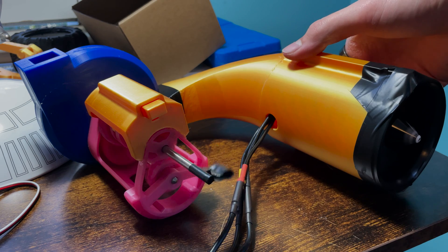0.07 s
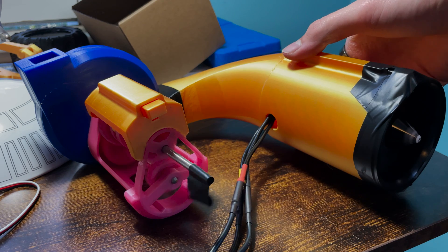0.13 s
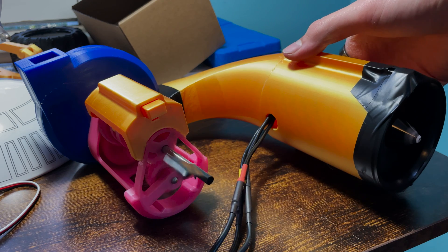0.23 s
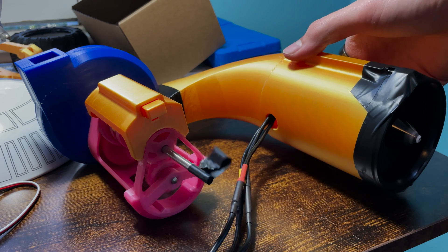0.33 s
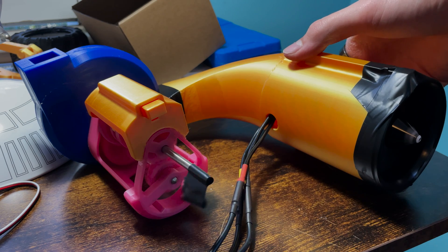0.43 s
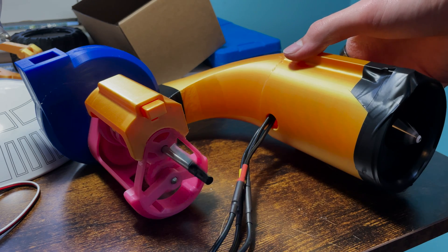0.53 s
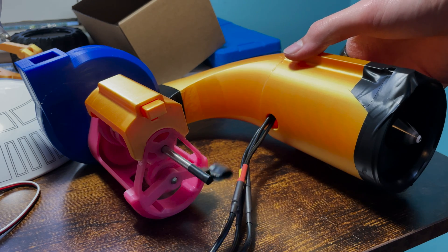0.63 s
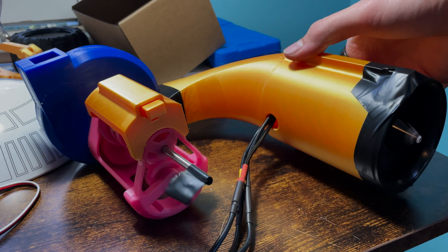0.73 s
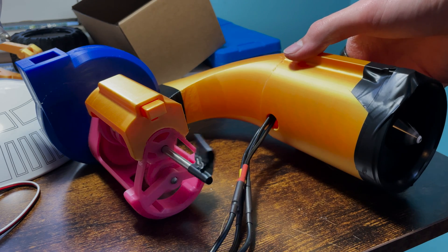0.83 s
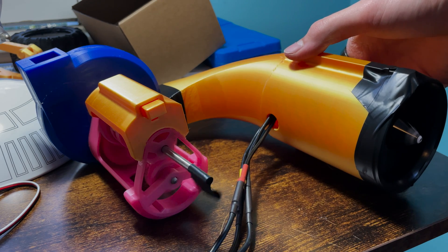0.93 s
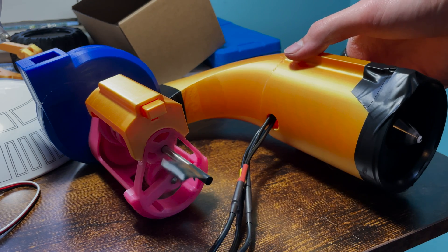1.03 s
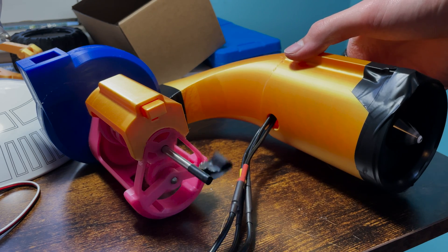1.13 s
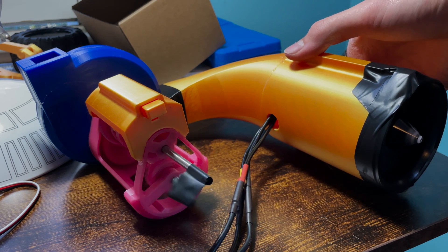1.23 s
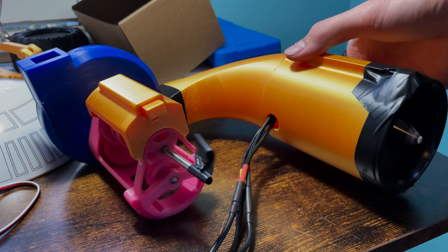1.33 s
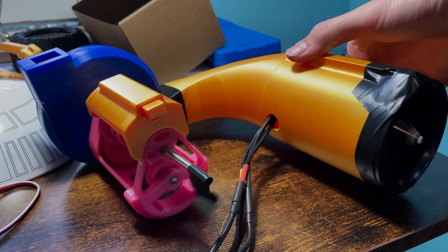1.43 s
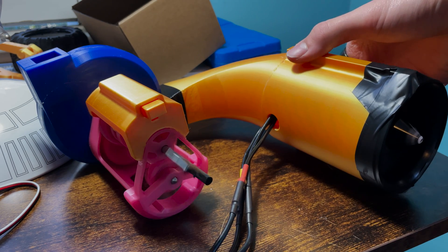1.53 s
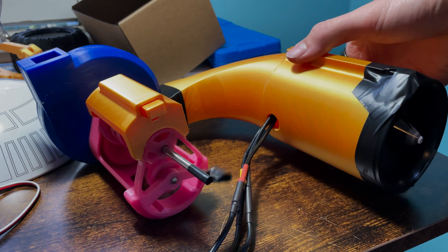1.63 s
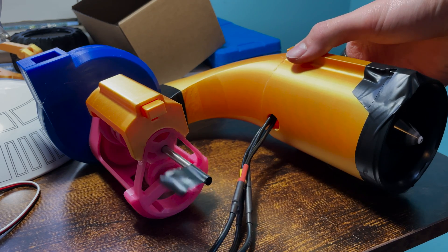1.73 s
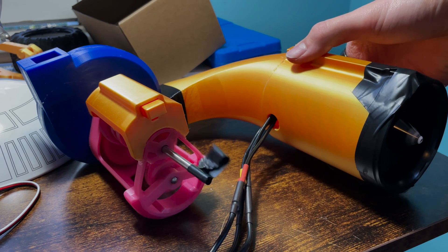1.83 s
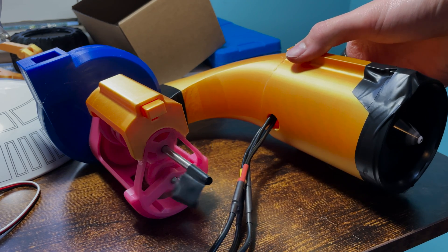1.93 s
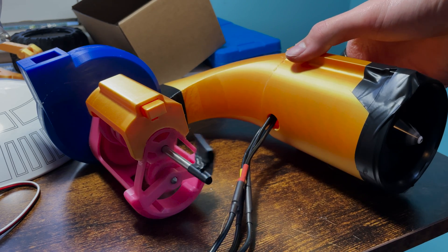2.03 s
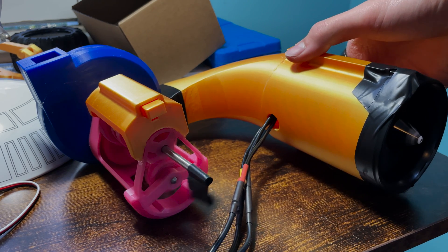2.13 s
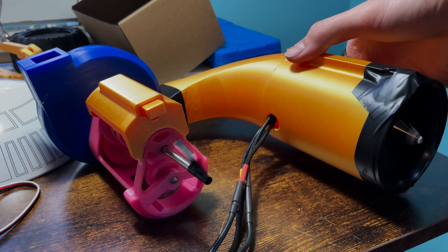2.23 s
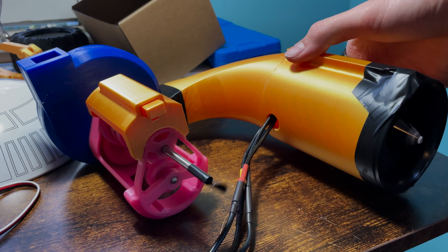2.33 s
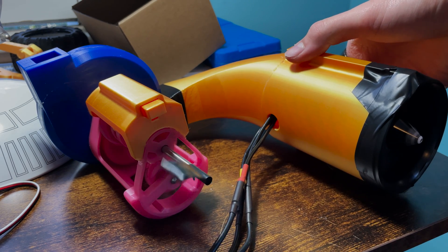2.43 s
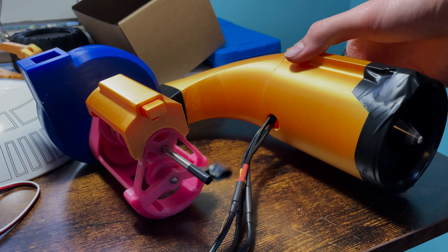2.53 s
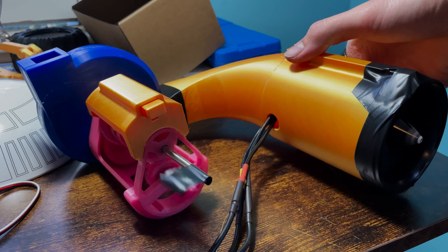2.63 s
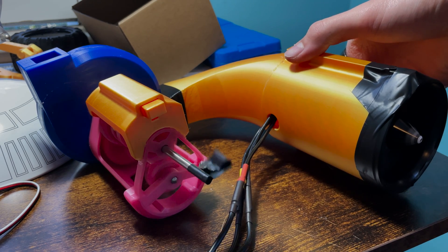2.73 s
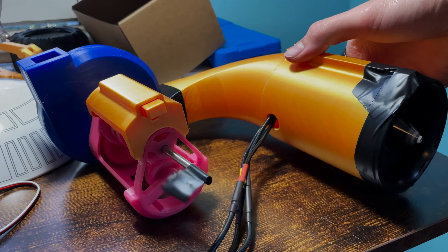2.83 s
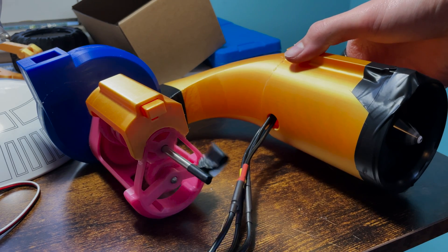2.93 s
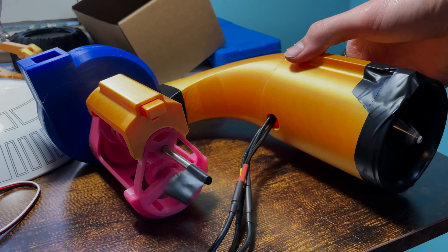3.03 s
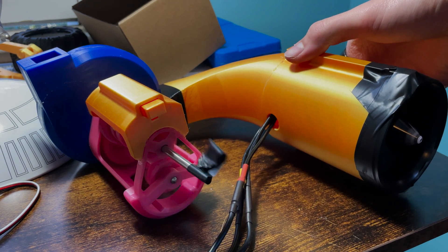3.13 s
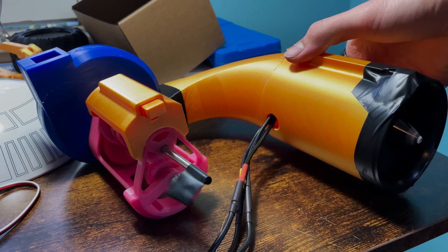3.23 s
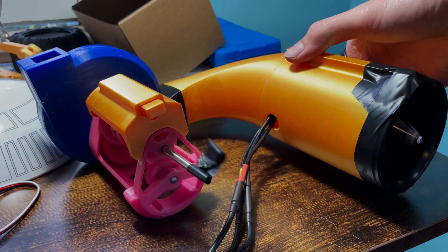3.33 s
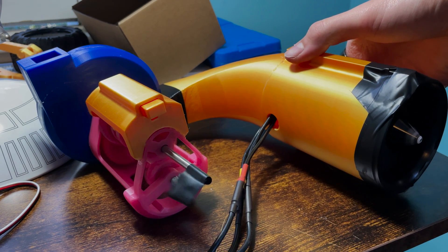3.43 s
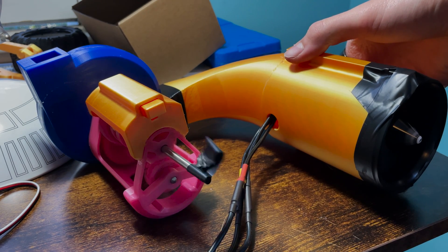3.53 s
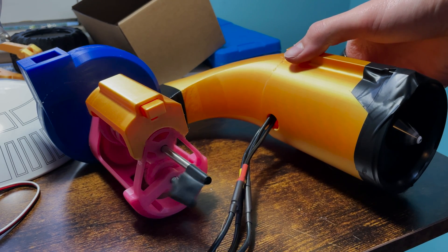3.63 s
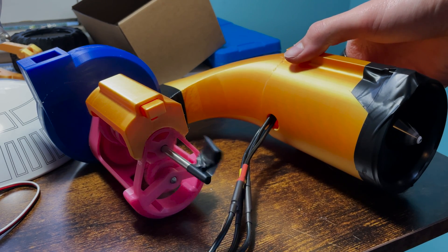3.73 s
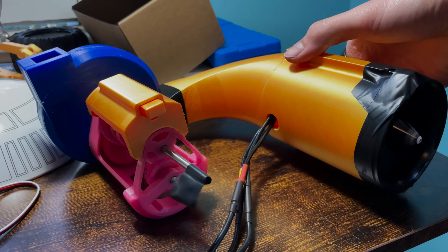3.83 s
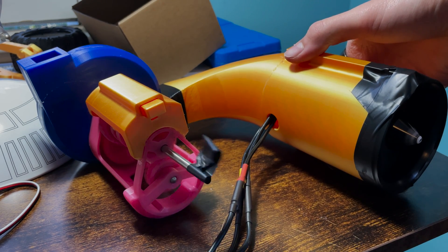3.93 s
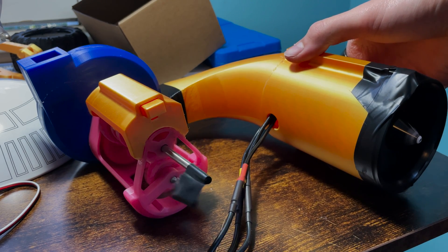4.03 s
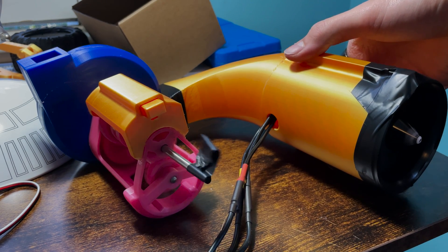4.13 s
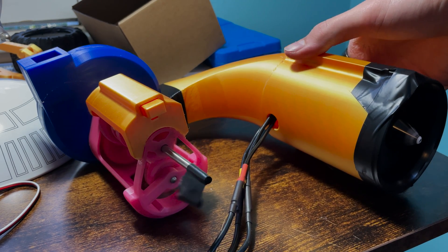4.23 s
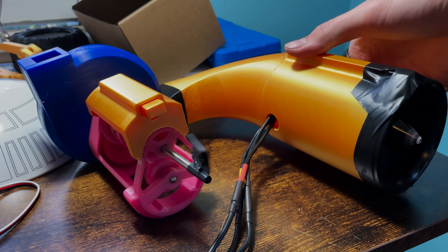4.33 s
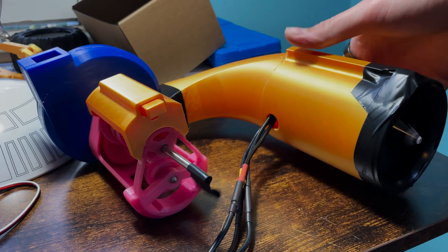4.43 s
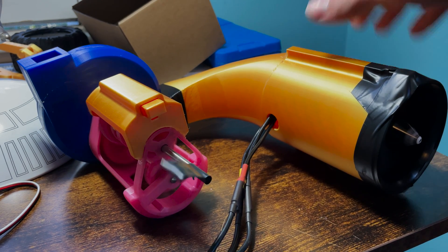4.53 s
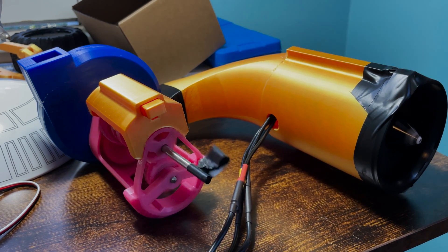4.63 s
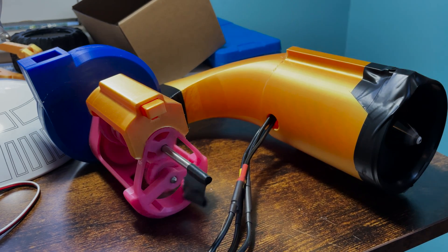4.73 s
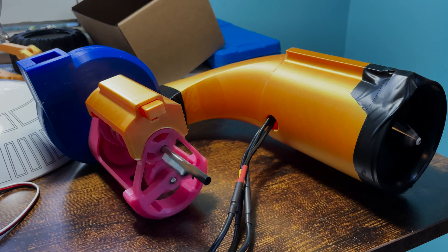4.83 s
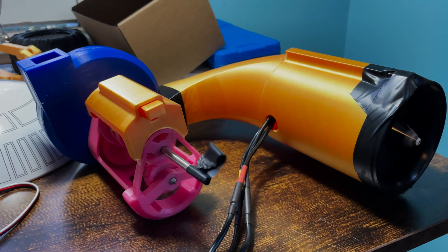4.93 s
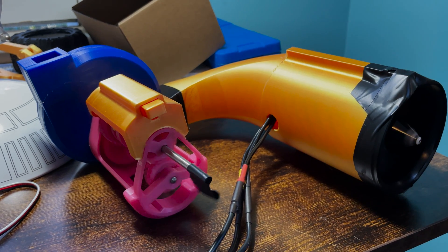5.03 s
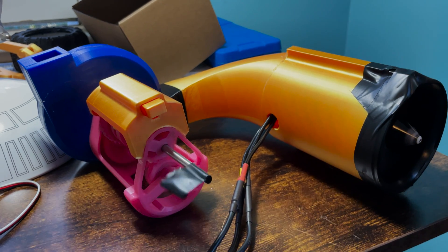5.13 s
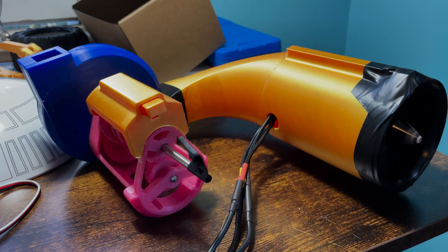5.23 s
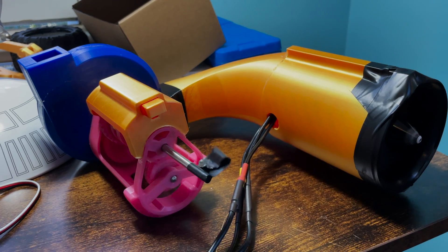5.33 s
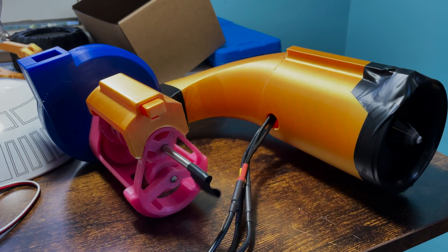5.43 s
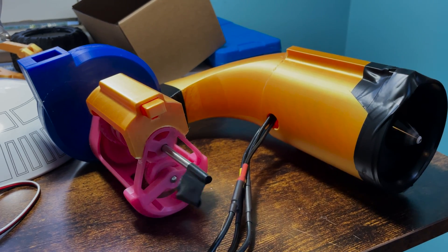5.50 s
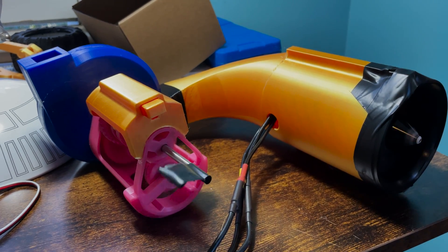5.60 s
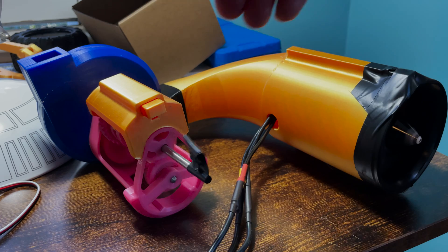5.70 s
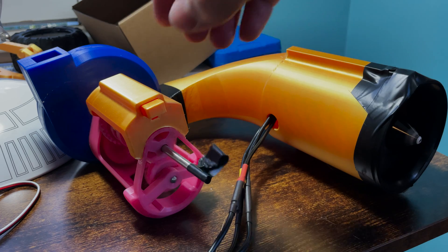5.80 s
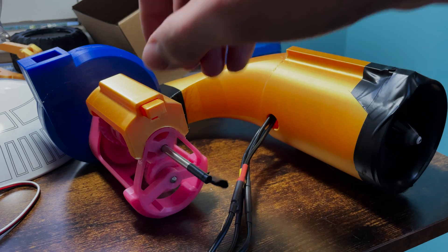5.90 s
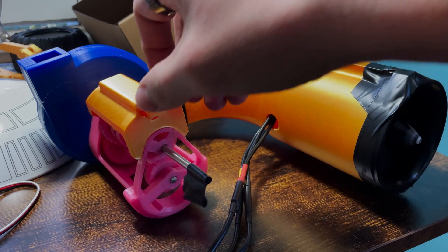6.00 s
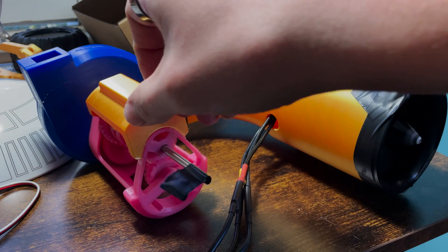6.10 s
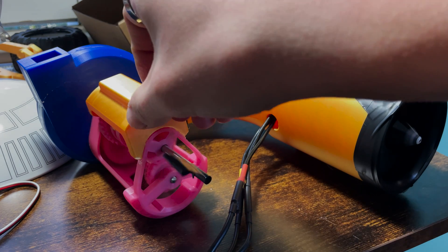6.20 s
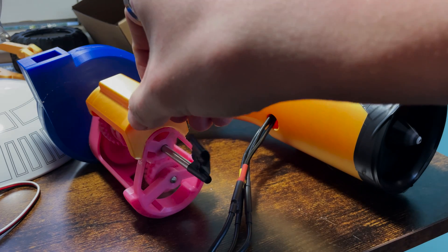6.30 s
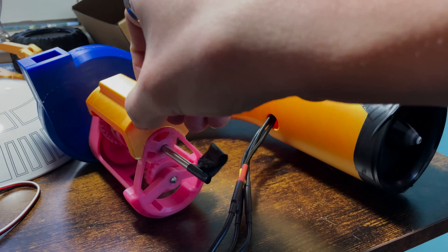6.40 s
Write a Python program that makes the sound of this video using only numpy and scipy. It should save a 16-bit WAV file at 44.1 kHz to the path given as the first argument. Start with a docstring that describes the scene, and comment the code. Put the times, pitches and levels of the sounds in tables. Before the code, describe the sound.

A small electric ducted fan blasts rushing, hissing air on a desk, abruptly narrows to a sharper hiss, then drops to a soft breathy whistle.

```python
"""On a desk, an electric ducted fan blows through a bent plastic duct into a small model turbine.
Shaped noise makes the air: it booms in the duct's resonances, hisses at the outlet and buffets the microphone.
A faint hum (two sine waves) and a whine (a narrow band of noise) climb in pitch.
For a while the sound abruptly narrows to a sharper hiss on the right.
It opens again with a puff, and the fan throttles down to a breathy whistle and picks up a little."""
import sys
import numpy as np
from scipy import signal
from scipy.fft import rfft, irfft, next_fast_len
from scipy.io import wavfile
from scipy.ndimage import map_coordinates

SR = 44100
rng = np.random.default_rng(int(sys.argv[2]) if len(sys.argv) > 2 else 0)


def to_wav(sig):
    """Store sig (one row per channel, or 1-D mono) as 16-bit WAV at the path in sys.argv[1].

    Samples outside -1..1 are clipped; the rate is SR.
    """
    pcm = np.clip(np.atleast_2d(sig), -1, 1) * 32767
    pcm = np.round(pcm).astype(np.int16)
    wavfile.write(sys.argv[1], SR, pcm.T)  # frames by channels


N = 284886

# The sound narrows, then opens again; each change is almost instant.
NARROWS_S, REOPENS_S, CHANGE_S = 2.519, 4.167, 0.0092
# The throttle is cut and the fan coasts down to idle.
THROTTLE_CUT_S = 4.169

# Slow air before the resonances colour it. Each row: frequency in Hz, relative level in dB per Hz.
BOOM_COLOUR = [(60, -55), (130, -19.5), (235, -13), (370, -6), (480, 4.5), (690, -3), (800, -11.5),
               (1000, -16), (1210, -7.5), (1500, -15.5), (2500, -22.5), (4000, -30.5)]
# How the open and the narrowed sound reach the two microphone ports. Each row: frequency in Hz,
# likeness of the two sides from 0 to 1, lead of the left side in radians, left-to-right balance in dB.
OPEN_PORTS = [(90, 0.41, 1.0, 2.5), (200, 0.64, 0.1, -2.0), (340, 0.75, 0.5, 1.0), (450, 0.95, -0.5, -3.5),
              (640, 0.79, -1.1, -2.5), (840, 0.27, -1.5, -0.5), (1060, 0.7, -0.5, -4.5),
              (1220, 0.92, -0.6, -3.5), (1580, 0.72, -1.5, 1.5), (1820, 0.4, -1.5, -1.5),
              (2200, 0.67, -1.4, 0.0), (2450, 0.33, -0.9, 0.0), (2900, 0.51, -1.4, -2.0),
              (3900, 0.85, -1.8, -2.0), (4200, 0.26, -1.6, -2.0), (4550, 0.49, -2.7, -2.0),
              (4900, 0.36, -2.9, 0.0), (5400, 0.88, -3.4, -1.5), (5950, 0.73, -3.2, -3.0),
              (6450, 0.21, -0.7, -3.0), (6750, 0.3, -1.5, -3.5), (7150, 0.39, 0.0, 0.5),
              (7600, 0.43, 0.1, 6.0), (8150, 0.58, -2.3, 0.5), (8700, 0.78, -3.3, -1.0),
              (9400, 0.86, -4.3, -2.0), (10800, 0.83, -5.7, 0.0), (12600, 0.7, -7.0, 0.0),
              (13400, 0.53, -8.0, 0.0)]
NARROW_PORTS = [(80, 0.78, 3.0, 0.0), (200, 0.87, 1.3, -4.5), (330, 0.74, 1.1, -1.5),
                (460, 0.95, 0.8, -4.5), (660, 0.21, -0.6, -4.5), (780, 0.55, -3.1, -4.0),
                (940, 0.34, -3.3, -5.5), (1230, 0.83, -1.5, -8.5), (1600, 0.54, -2.5, -2.5),
                (2350, 0.38, -2.8, -4.0), (3080, 0.85, -3.3, -3.0), (3400, 0.42, -3.4, -3.0),
                (3980, 0.72, -4.2, -6.5), (4500, 0.79, -5.5, -2.5), (4950, 0.54, -5.7, -1.5),
                (5200, 0.7, -7.3, -4.5), (5400, 0.72, -8.5, -2.0), (5920, 0.88, -8.9, -1.0),
                (6550, 0.6, -7.0, -3.0), (7500, 0.59, -6.2, -2.5), (7850, 0.35, -4.0, -1.5),
                (8150, 0.64, -4.0, -3.5), (8900, 0.48, -4.5, -10.0), (10100, 0.1, -7.1, -24.5),
                (11500, 0.07, -10.1, -14.0), (13300, 0.17, -12.1, -9.0)]
# The open stream at full throttle, before each sound's own offset is added.
# Each row: time in seconds, rush in the duct in dB, hiss at the outlet in dB.
FULL_THROTTLE = [(0, -25, -29.5), (0.2, -24.5, -28.5), (0.43, -23.5, -26.5), (0.72, -24.5, -26.5),
                 (1.0, -26, -28.5), (1.35, -27, -29), (1.55, -26, -28), (2.1, -28, -29), (2.43, -27.5, -29),
                 (2.5, -27.5, -28)]


def from_db(db):
    """Turn decibels into gain."""
    return 10 ** (np.asarray(db) / 20)


def rms_one(x):
    """Scale a sound to an average power of one."""
    return x / np.sqrt(np.mean(x ** 2) + 1e-20)


def in_time(rows):
    """Draw straight lines between the rows of a table to get each column sample by sample."""
    seconds, *columns = np.transpose(rows)
    return [np.interp(np.arange(N) / SR, seconds, column) for column in columns]


def at_hz(points, hz):
    """Read each column of a table at any frequency, on a logarithmic frequency axis."""
    table_hz, *columns = np.transpose(points)
    return [np.interp(np.log(hz), np.log(table_hz), column) for column in columns]


def ramp(start_s, length_s):
    """Stay at zero until the start, rise in a straight line to one, then stay there."""
    return np.clip((np.arange(N) / SR - start_s) / length_s, 0, 1)


def lasting(start_s, end_s, rise_s, fall_s):
    """Give one between two moments and zero outside, with a ramp centred on each moment."""
    begun = ramp(start_s - rise_s / 2, rise_s)
    ended = ramp(end_s - fall_s / 2, fall_s)
    return begun * (1 - ended)


def stages():
    """Make gates for the full, narrowed and throttled stages; the three always add up to one."""
    narrows = ramp(NARROWS_S - CHANGE_S / 2, CHANGE_S)
    reopens = ramp(REOPENS_S - CHANGE_S / 2, CHANGE_S)
    return 1 - narrows, narrows - reopens, reopens


def coasting(start_db, idle_db, coast_s, pickup_db, pickup_s, takes_s):
    """After the throttle cut an air sound sinks exponentially to idle; a later pickup lifts it again."""
    since_cut_s = np.maximum(np.arange(N) / SR - THROTTLE_CUT_S, 0)
    left = np.exp(-since_cut_s / coast_s)
    sinking = from_db(start_db) * left + from_db(idle_db) * (1 - left)
    return sinking * from_db(pickup_db * ramp(pickup_s, takes_s))


def drift(rate):
    """Wander smoothly at random, with spread 1; changes faster than the rate in Hz are weakened."""
    size = next_fast_len(N)
    hz = np.fft.rfftfreq(size, 1 / SR)
    spectrum = rfft(rng.standard_normal(size)) / (1 + (hz / rate) ** 2)
    return rms_one(irfft(spectrum, size)[:N])


def modes_of(stage):
    """Pick the duct's resonances as heard in one stage: centre in Hz, width in Hz, lift in dB."""
    # Resonances of duct and housing. Each row: centre in Hz, width in Hz,
    # lift when full in dB, lift when narrowed in dB, lift when throttled in dB.
    duct_modes = [(285, 46, 1, -0.5, 4), (435, 60, 10, 5.5, 6), (645, 33, -2.5, 3.5, 4),
                  (740, 31, 3, 4.5, -1.5), (885, 41, 5.5, 6, 7.5), (1216, 76, 4, 10, 10.5),
                  (1424, 286, 7.5, 3.5, 5.5), (1637, 44, 0, -0.5, 9.5), (2057, 440, 7.5, 3, 10.5),
                  (2854, 66, 1.5, 1.5, 5), (3080, 120, 6.5, 8.5, 10.5), (3333, 150, 5.5, 3, 3.5),
                  (3784, 195, 6.5, -1, 9.5), (3967, 260, 5.5, 9, 1), (4377, 180, 5, 5.5, 4.5),
                  (4696, 113, 6.5, 8, 6.5), (5180, 210, 5, 6, 5), (5436, 230, 7, 4.5, 5),
                  (5885, 170, 6.5, 10, 5.5), (6660, 320, 3.5, 2, 2.5), (7350, 250, 1, -0.5, 4),
                  (7510, 250, 7, 4, 2.5), (8150, 90, 4, 7, 5), (8300, 220, 5, 1.5, 0),
                  (8890, 320, 9, 2.5, 5), (9470, 310, 8.5, 1, 1.5), (10840, 350, 2.5, -3, 1)]
    lift_column = 2 + ["full", "narrowed", "throttled"].index(stage)
    return np.array(duct_modes)[:, [0, 1, lift_column]]


def turbulence(colour, modes, ports):
    """Eddies make noise, which is lifted at each resonance and reaches two spaced ports; rms 1."""
    size = next_fast_len(N)
    hz = np.maximum(np.fft.rfftfreq(size, 1 / SR), 1)
    colour_db, = at_hz(colour, hz)
    lift_db = sum(db / (1 + (2 * (hz - centre) / width) ** 2) for centre, width, db in modes)
    likeness, lead, balance_db = at_hz(ports, hz)
    likeness = np.clip(likeness, 0, .98)
    # both ports share the direct sound; what desk and walls scatter differs between them
    direct, scattered = rfft(rng.standard_normal((2, size)))
    direct = np.sqrt(1 + likeness) * direct
    scattered = np.sqrt(1 - likeness) * scattered
    left = (direct + scattered) * from_db(balance_db / 2) * np.exp(1j * lead)
    right = (direct - scattered) * from_db(-balance_db / 2)
    # the balance must not change the total power of the two sides
    equal_power = 1 / np.sqrt(from_db(balance_db) + from_db(-balance_db))
    spectrum = np.array([left, right]) * equal_power * from_db(colour_db + lift_db)
    return rms_one(irfft(spectrum, size)[:, :N])


def breathy_tone(pitch_hz, width_hz, ports):
    """A narrow band of noise sits around a steady or gliding pitch; rms 1."""
    wander = drift(width_hz) + 1j * drift(width_hz)
    tone = wander * np.exp(2j * np.pi * np.cumsum(pitch_hz * np.ones(N)) / SR)
    _, lead, balance_db = at_hz(ports, np.mean(pitch_hz))
    left = tone * from_db(balance_db) * np.exp(1j * lead)
    return rms_one(np.real([left, tone]))


def open_stream(rush_gain, hiss_gain, rush_colour, modes, top_hz, flutter_db):
    """Air rushes through the duct and hisses at the outlet; both levels flutter together."""
    # Outlet hiss before the resonances. Each row: frequency in Hz, relative level in dB per Hz.
    hiss_colour = [(500, -32), (1500, -14.5), (2600, -4), (3500, -3.5), (4800, -1.5), (6300, -2),
                   (8200, -6.5), (9700, -4.5), (10400, -4.5), (11800, -3.5), (13000, -7.5), (14000, -11)]
    rush = rush_gain * turbulence(rush_colour, modes, OPEN_PORTS)
    hiss = hiss_gain * turbulence(hiss_colour, modes, OPEN_PORTS)
    # a slower jet sheds fewer of the smallest eddies, so its top ends lower
    hiss = signal.sosfilt(signal.butter(6, top_hz, fs=SR, output="sos"), hiss)
    return (rush + hiss) * from_db(flutter_db * drift(14.0))


def full_stream(rush_gain_db, hiss_gain_db):
    """With the fan blowing hard, the open stream rushes and hisses strongly."""
    # Rush before the resonances. Each row: frequency in Hz, relative level in dB per Hz.
    rush_colour = [(100, -24), (170, -4.5), (235, -6), (290, 0), (370, 4), (600, 1), (740, 0), (950, -2),
                   (1100, -1.5), (1400, -2), (1800, -6), (2500, -4.5), (3500, -3), (6000, -16),
                   (12000, -25)]
    rush_db, hiss_db = in_time(FULL_THROTTLE)
    rush_gain, hiss_gain = from_db(rush_db + rush_gain_db), from_db(hiss_db + hiss_gain_db)
    return open_stream(rush_gain, hiss_gain, rush_colour, modes_of("full"), top_hz=15900, flutter_db=0.47)


def duct_boom(over_rush_db, narrowed_db, flutter_db):
    """Slow air booms in the duct's resonances; it follows the rush and shifts right while narrowed."""
    # Times when the boom drops away. Each row: start in seconds, end in seconds, depth in dB.
    boom_dips = [(2.84, 3.586, 12.5), (4.165, 4.806, 13)]
    fall_s, recover_s = 0.014, 0.13
    full, narrowed, throttled = stages()
    rush_db, _ = in_time(FULL_THROTTLE)
    slowing = coasting(start_db=-34, idle_db=-44.5, coast_s=0.13, pickup_db=2.5, pickup_s=4.95, takes_s=0.24)
    open_gain = full * from_db(rush_db + over_rush_db) + throttled * slowing
    open_boom = open_gain * turbulence(BOOM_COLOUR, modes_of("throttled"), OPEN_PORTS)
    narrow_noise = turbulence(BOOM_COLOUR, modes_of("narrowed"), NARROW_PORTS)
    boom = open_boom + narrowed * from_db(narrowed_db) * narrow_noise
    dips_db = sum(depth_db * lasting(start, end, fall_s, recover_s) for start, end, depth_db in boom_dips)
    return from_db(flutter_db * drift(15.0) - dips_db) * boom


def buffeting(full_db, growth_db_per_s, narrowed_db, lumpy_db, thump_s):
    """Stray air rumbles on the microphone, and single gusts swell and pass as thumps."""
    # Rumble of the gusts. Each row: frequency in Hz, relative level in dB per Hz.
    gust_colour = [(15, -44), (28, -26), (45, -3), (80, 4.5), (130, 2), (190, 4), (300, -39), (800, -23)]
    # Gusts at the two microphone ports. Each row: frequency in Hz, likeness from 0 to 1,
    # lead of the left side in radians, left-to-right balance in dB.
    gust_ports = [(30, 0.34, 0, 6), (100, 0.38, 0, 0.5), (250, 0.54, 0, 2.6)]
    # Single gusts. Each row: time of the peak in seconds, level in dB.
    gust_thumps = [(0.23, -46), (0.5, -36), (1.26, -40), (1.885, -37), (1.945, -44), (2.28, -40),
                   (2.365, -44), (2.47, -38), (2.52, -35), (4.19, -45)]
    full, narrowed, throttled = stages()
    t = np.arange(N) / SR
    slowing = coasting(start_db=-59, idle_db=-70.5, coast_s=0.085, pickup_db=7.5, pickup_s=4.93, takes_s=0.2)
    stray = full * from_db(full_db + growth_db_per_s * t)
    stray = stray + narrowed * from_db(narrowed_db) + throttled * slowing
    stray = stray * from_db(lumpy_db * drift(7.4))
    thumps = sum(from_db(db) * np.exp(-((t - peak_s) / thump_s) ** 2) for peak_s, db in gust_thumps)
    return (stray + thumps) * turbulence(gust_colour, [], gust_ports)


def early_ring(level_db, centre_hz, width_hz, until_s, fade_s):
    """One duct resonance sings out while the rush is at its strongest, then fades."""
    fade = 1 - ramp(until_s, fade_s)
    return from_db(level_db) * fade * breathy_tone(centre_hz, width_hz, OPEN_PORTS)


def hum(octave_db, waver, flutter_db, pan_db):
    """A low tone and its octave climb as the model spins up and sag once the throttle is cut."""
    # Each row: time in seconds, pitch in Hz before wavering, level in dB before flutter and panning.
    hum_path = [(0.2, 152, -62), (0.8, 170.2, -60), (1.3, 184, -46.5), (1.85, 195.2, -51.5),
                (2.38, 199.4, -48), (2.55, 203.3, -50.5), (2.82, 211, -48.5), (2.88, 213.3, -61),
                (3.2, 222.2, -64), (4.0, 223, -68), (4.3, 208, -62), (4.6, 189, -85)]
    pitch_hz, level_db = in_time(hum_path)
    phase = 2 * np.pi * np.cumsum(pitch_hz * (1 + waver * drift(17.0))) / SR
    tone = np.sqrt(2) * (np.sin(phase) + from_db(octave_db) * np.sin(2 * phase))
    sides_db = pan_db / 2 * np.array([[1], [-1]])  # left, right
    return from_db(level_db + flutter_db * drift(8.2) + sides_db) * tone


def whine(width_hz):
    """A thin, breathy whine climbs out of the hiss and sinks back into it."""
    # Each row: time in seconds, pitch in Hz, level in dB.
    whine_path = [(0.5, 6800, -65), (0.75, 6840, -46), (0.97, 6885, -45.5), (1.13, 6960, -46),
                  (1.4, 6966, -47), (1.9, 6972, -62)]
    pitch_hz, level_db = in_time(whine_path)
    return from_db(level_db) * breathy_tone(pitch_hz, width_hz, OPEN_PORTS)


def wavering(x, depth, rate):
    """All the resonances waver slightly up and down, like an uneven playing speed."""
    position = np.cumsum(1 + depth * drift(rate))
    return np.array([map_coordinates(side, [position], order=5, mode="mirror") for side in x])


def narrowed_stream():
    """The narrowed rush wavers slightly, rings most near 1.2, 3.1, 4 and 5.9 kHz and has little top."""
    # Narrowed rush before the resonances. Each row: frequency in Hz, relative level in dB per Hz.
    narrow_colour = [(40, -25), (140, -14), (220, -9.5), (450, -4.5), (600, -6.5), (760, -6), (1000, -5),
                     (1350, -3), (1600, -1), (2800, -0.6), (3700, 0.5), (4300, 0), (4900, 0), (5300, 1),
                     (6400, -2), (7800, -6.5), (8600, -2), (10500, -8), (14000, -29.5)]
    # The narrowed sound builds a little, sags, and dips just before the sound opens again.
    # Each row: time in seconds, level in dB before flutter.
    narrowed_level = [(2.55, -27), (2.85, -24.5), (3.15, -25), (3.5, -25.5), (3.9, -27.5), (4.09, -27),
                      (4.135, -31.5), (4.17, -31)]
    level_db, = in_time(narrowed_level)
    rush = wavering(turbulence(narrow_colour, modes_of("narrowed"), NARROW_PORTS), depth=.003, rate=12)
    flutter_db = .3 * drift(14)
    return from_db(level_db + flutter_db) * rush


def throttled_stream():
    """As the fan slows, the hiss sinks further than the rush; both pick up slowly."""
    # Rush at idle before the resonances. Each row: frequency in Hz, relative level in dB per Hz.
    idle_rush_colour = [(100, -25), (175, -1), (250, -2), (370, -2.5), (600, 1.5), (780, -5), (1060, -5),
                        (1400, -4.5), (1800, -6), (2200, -5), (2500, -5), (3100, -3), (3700, -5),
                        (6000, -17), (12000, -16)]
    rush = coasting(start_db=-33.5, idle_db=-47.5, coast_s=0.13, pickup_db=3.0, pickup_s=4.8, takes_s=0.72)
    hiss = coasting(start_db=-27.0, idle_db=-49, coast_s=0.12, pickup_db=1.5, pickup_s=4.4, takes_s=.8)
    return open_stream(rush, hiss, idle_rush_colour, modes_of("throttled"), top_hz=12700, flutter_db=0.96)


def reopening_puff(level_db, centre_hz, width_hz, decay_s):
    """A breathy tone in the middle of the range dies away from the moment the sound opens again."""
    since_s = np.maximum(np.arange(N) / SR - REOPENS_S, 0)
    fade = np.exp(-since_s / decay_s)
    return from_db(level_db) * fade * breathy_tone(centre_hz, width_hz, OPEN_PORTS)


def idle_whistle(level_db, centre_hz, width_hz, swell_s):
    """As the flow slows, a breathy whistle in the duct emerges and carries on while the rush dies away."""
    r = np.exp(-np.pi * width_hz / SR)
    resonator = [1, -2 * r * np.cos(2 * np.pi * centre_hz / SR), r * r]
    eddies = turbulence(BOOM_COLOUR, [], OPEN_PORTS)
    for _ in range(2):  # the second pass narrows the whistle further
        eddies = signal.lfilter([1, 0, -1], resonator, eddies)
    return ramp(THROTTLE_CUT_S, swell_s) * from_db(level_db) * rms_one(eddies)


def desk_echoes(hz, count=12):
    """Echoes from the desk and nearby boxes ripple the spectrum; small things reflect only short waves."""
    share, reach_s, low_hz = 0.2, .025, 1200  # strength, latest arrival, pitch below which echoes weaken
    delays_s = reach_s * rng.uniform(.25, 1, count)
    reflected = share * hz ** 2 / (hz ** 2 + low_hz ** 2)
    arrivals = sum(np.exp(-2j * np.pi * hz * delay_s) for delay_s in delays_s)
    return 1 + reflected / np.sqrt(count) * arrivals


def on_desk(x):
    """Add the short echoes to a sound by filtering its spectrum."""
    size = next_fast_len(N + SR // 10)  # spare room so that echoes do not wrap round to the start
    hz = np.fft.rfftfreq(size, 1 / SR)
    return irfft(rfft(x, size) * desk_echoes(hz), size)[:, :N]


def scene():
    """Mix all the air sounds, the whine and the hum."""
    full, narrowed, throttled = stages()
    stream = full * full_stream(rush_gain_db=0.0, hiss_gain_db=6.5)
    stream = stream + narrowed * narrowed_stream() + throttled * throttled_stream()
    boom = duct_boom(over_rush_db=-1.83, narrowed_db=-34, flutter_db=1.0)
    wind = buffeting(full_db=-55.5, growth_db_per_s=4.0, narrowed_db=-88, lumpy_db=4.0, thump_s=0.016)
    ring = early_ring(level_db=-34.5, centre_hz=3810, width_hz=56, until_s=0.85, fade_s=0.25)
    tone = hum(octave_db=-6, waver=0.0013, flutter_db=1.1, pan_db=-5.0)
    thin_whine = whine(width_hz=14)
    puff = reopening_puff(level_db=-35, centre_hz=1306, width_hz=170, decay_s=0.063)
    whistle = idle_whistle(level_db=-54.5, centre_hz=1212, width_hz=51, swell_s=0.2)
    echoed = on_desk(stream + boom + whistle)
    return echoed + full * (ring + thin_whine) + throttled * puff + wind + tone


def record(dry):
    """Cut the top steeply above 13.9 kHz."""
    return signal.sosfilt(signal.ellip(12, .1, 80, 13900, fs=SR, output="sos"), dry)


dry = scene()
out = record(dry)
to_wav(out)
```